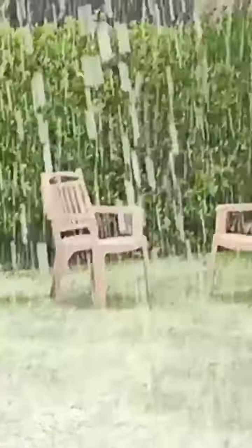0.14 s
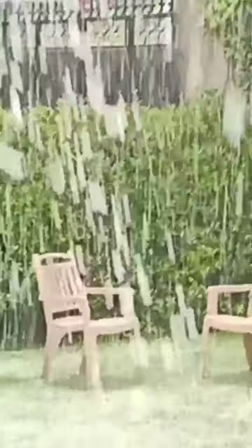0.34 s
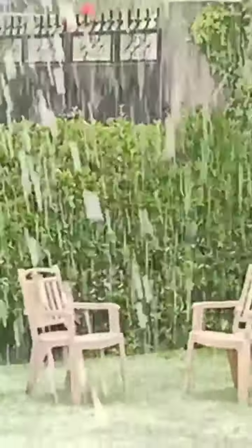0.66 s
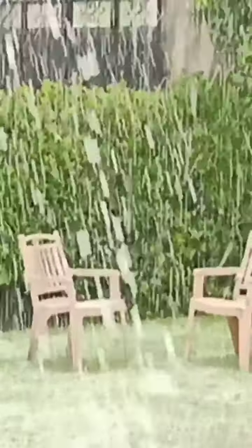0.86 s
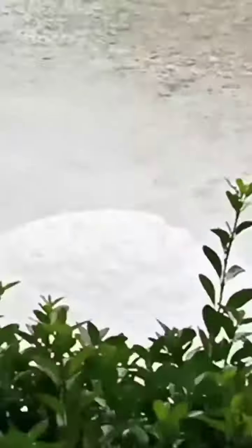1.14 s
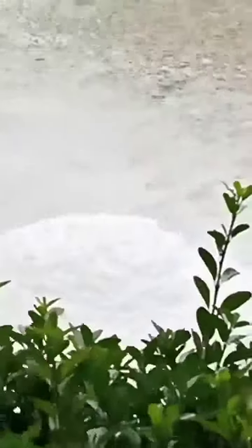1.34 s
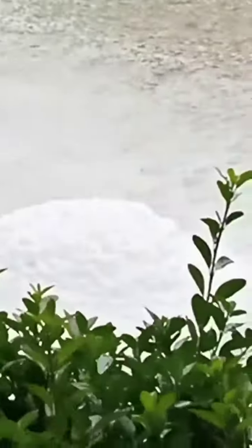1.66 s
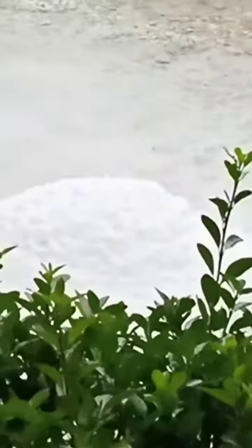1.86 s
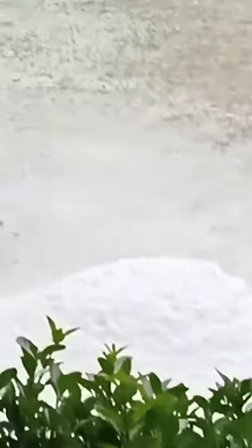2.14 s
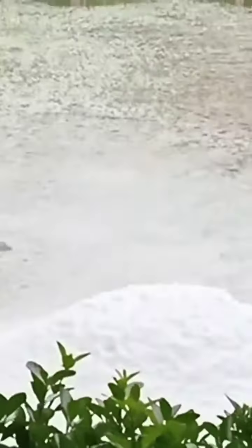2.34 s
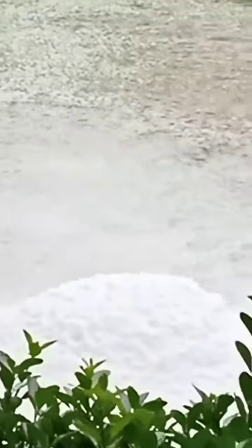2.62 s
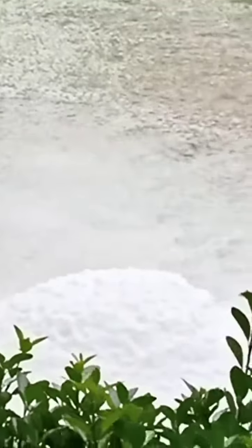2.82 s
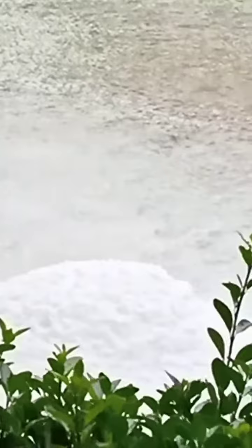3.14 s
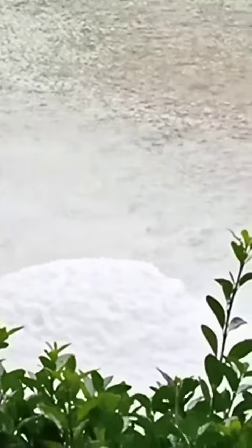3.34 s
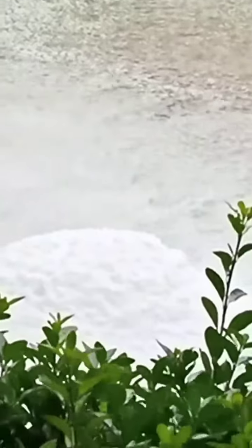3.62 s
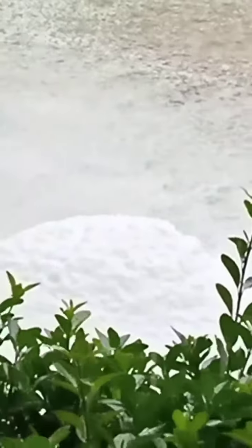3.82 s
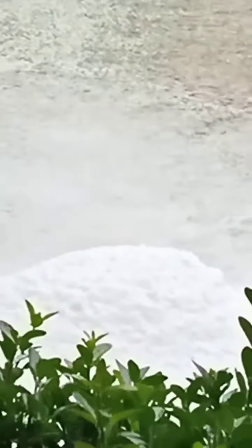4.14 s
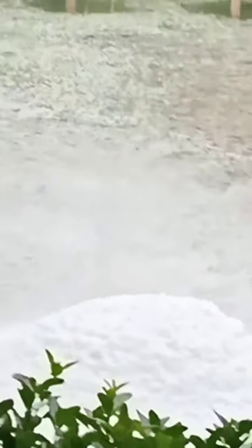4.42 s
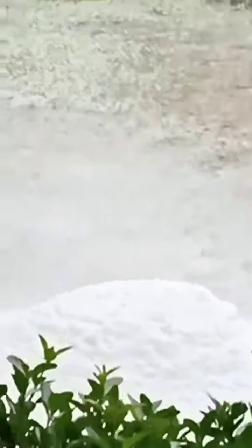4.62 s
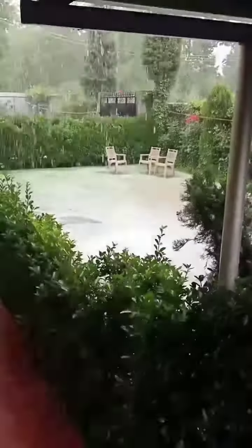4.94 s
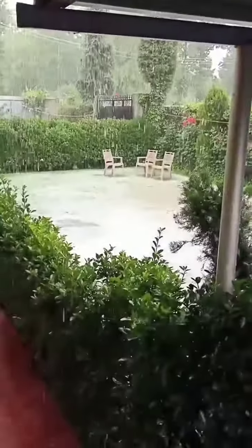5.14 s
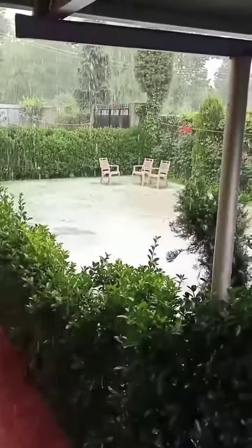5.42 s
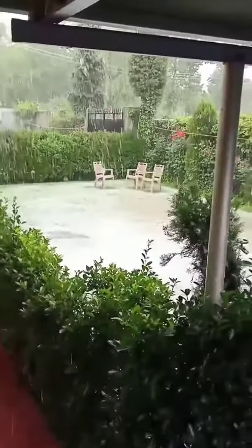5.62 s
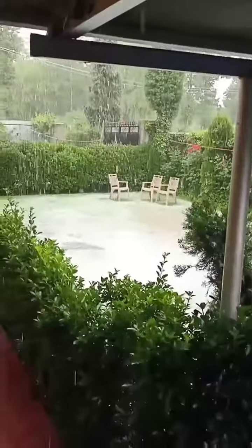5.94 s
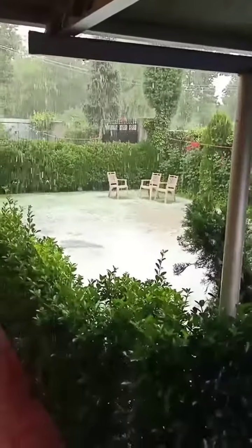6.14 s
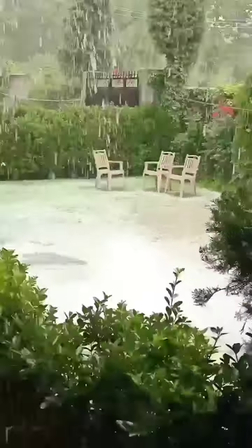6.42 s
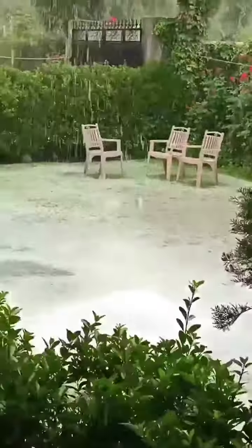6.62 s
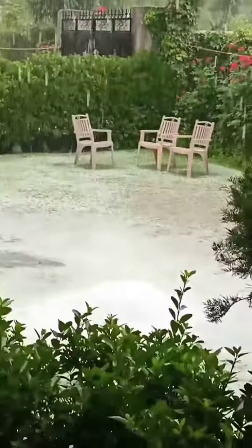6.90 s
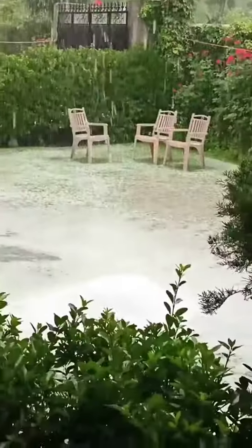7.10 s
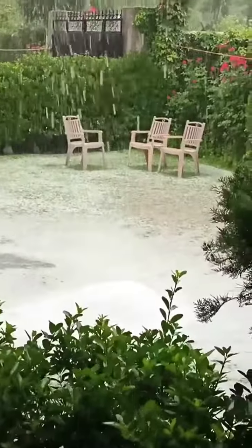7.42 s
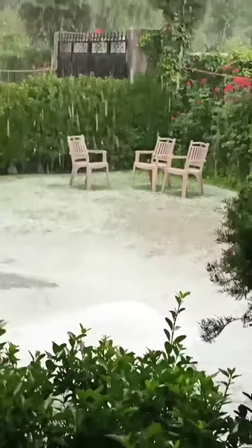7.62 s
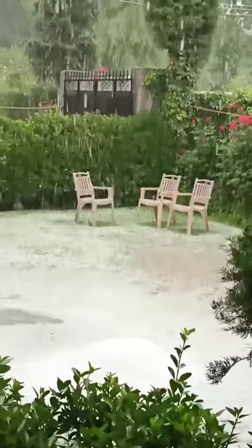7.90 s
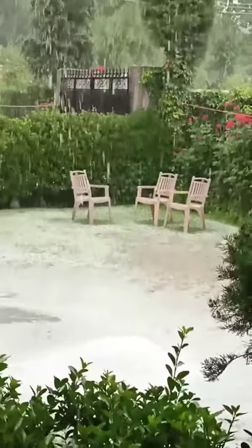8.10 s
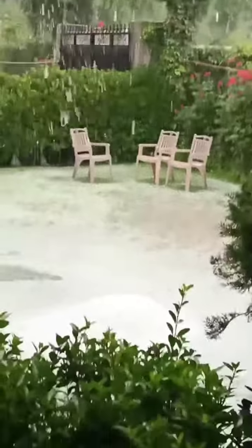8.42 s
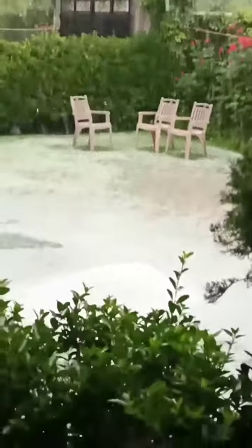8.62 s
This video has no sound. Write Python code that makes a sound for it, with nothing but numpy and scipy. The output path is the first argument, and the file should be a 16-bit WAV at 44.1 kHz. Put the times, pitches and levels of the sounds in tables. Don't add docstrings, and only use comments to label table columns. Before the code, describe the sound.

Dense hail pours down steadily, drumming on a porch roof and pattering on lawn and paving, with low gusts of wind buffeting the microphone.

```python
import sys
import numpy as np
from scipy import signal
from scipy.fft import rfft, irfft, next_fast_len
from scipy.io import wavfile
from scipy.ndimage import uniform_filter1d, map_coordinates

SR = 44100
rng = np.random.default_rng(int(sys.argv[2]) if len(sys.argv) > 2 else 0)


def int16_out(signal):
    q = np.round(np.clip(np.atleast_2d(signal).T, -1, 1) * 32767)
    wavfile.write(sys.argv[1], SR, q.astype(np.int16))


def volts_from_db(level):
    exponent = np.asarray(level, float) / 20
    return 10 ** exponent


N = 386307

TILT_S = 1.25


def unit(x):
    return x / np.sqrt(np.mean(x ** 2) + 1e-20)


def along(points, hz):
    f, v = np.transpose(points)
    return np.interp(np.log(hz + 1), np.log(f + 1), v)


def curves(rows):
    s, *cols = np.transpose(rows)
    return [np.interp(np.arange(N) / SR, s, c) for c in cols]


def wobble(rate):
    knots = rng.standard_normal(int(N * rate / SR) + 4)
    return map_coordinates(knots, [np.arange(N) * rate / SR])


def spell(start, end, edge_s):
    t = np.arange(N) / SR
    return np.clip(np.minimum(t - start, end - t) / edge_s + .5, 0, 1)


def filtered(x, response):
    m = next_fast_len(N + 8192)
    return irfft(rfft(x, m) * response(np.fft.rfftfreq(m, 1 / SR)), m)[..., :N]


def patchy(x, depth_db):
    z = signal.stft(x, nperseg=512)[2]
    field = uniform_filter1d(rng.standard_normal(z.shape[1:]), size=6, axis=0)
    field = uniform_filter1d(field, size=10, axis=1)
    return signal.istft(z * volts_from_db(depth_db * unit(field)), nperseg=512)[1][:, :N]


def strikes(chance, spread_db, near_db):
    lands = rng.random((2, N)) < chance
    size = volts_from_db(spread_db * np.minimum(rng.exponential(size=(2, N)), 4))
    size = size * rng.choice([-1, 1], size=(2, N))
    return rng.standard_normal((2, N)) + volts_from_db(near_db) * unit(lands * size)


# (f/Hz, left-right likeness)
PORT_LIKENESS = [(130, 1), (170, .98), (220, .95), (300, .88), (470, .45), (640, .65), (800, .38),
                 (1200, .26), (1700, .2), (2100, .04)]
# (f/Hz, left minus right level/dB)
PORT_LEAN = [(110, -1), (210, 5.5), (330, 1.5), (500, -0.5), (770, 1), (1170, 3), (1790, 5), (2740, 3),
             (4000, 3), (4600, 1.5), (6400, 0), (6900, 4.5), (7600, -9)]
# (f/Hz, lag of the left port/rad)
PORT_LAG = [(60, 3.5), (300, -0.05), (470, 1), (570, 0.17), (900, 1.16), (1200, 2.5), (1600, 3), (2500, 5)]


def ports(pair, spectrum):
    def mix(hz):
        angle = np.arccos(np.clip(along(PORT_LIKENESS, hz), 0, 1)) / 2
        return volts_from_db(along(spectrum, hz)) * [np.cos(angle), np.sin(angle)]

    def split(hz):
        half = volts_from_db(along(PORT_LEAN, hz) / 2) * np.exp(-.5j * along(PORT_LAG, hz))
        return np.array([half, 1 / half])

    mid, side = filtered(pair, mix)
    return unit(filtered(np.array([mid + side, mid - side]), split))


# (f/Hz, level/dB per Hz)
ROOF_SPECTRUM = [(120, -120), (190, -9.5), (240, -5), (320, 1.5), (400, 1.5), (470, 0), (640, 0),
                 (720, -3.5), (800, -11.5), (1300, -38.5), (2500, -120)]


def roof_drumming(heavy):
    sway_db = 0.87 * wobble(4)
    return volts_from_db(-1.36 + sway_db) * ports(patchy(heavy, depth_db=0.33), ROOF_SPECTRUM)


# (f/Hz, level/dB per Hz)
BOOM_SPECTRUM = [(25, -39), (45, -21.5), (70, -5.5), (100, -1), (160, 3), (210, -6), (280, -21.5),
                 (500, -120)]
# (f/Hz, level/dB of the difference between the ports)
BOOM_SPREAD = [(90, -43), (140, -22), (200, -15)]


def roof_boom(heavy):
    mid, side = filtered(heavy, lambda hz: volts_from_db(along(BOOM_SPECTRUM, hz) + [0 * hz, along(BOOM_SPREAD, hz)]))
    squall_db = 3 * spell(2.3, 3.4, 0.22)
    return unit(np.array([mid + side, mid - side])) * volts_from_db(-12 + 1.3 * wobble(2.5) + squall_db)


# (f/Hz, level/dB per Hz)
GROUND_SPECTRUM = [(120, -120), (300, -48.5), (640, -4.5), (820, -1), (1030, 1), (1400, -2), (2100, -1),
                   (2900, -3), (3600, -9.5), (4300, -29.5), (5000, -61), (6000, -120)]
# (f/Hz, level/dB)
BEFORE_TILT = [(500, 1), (720, 1.5), (1000, -0.5), (1500, 2.5), (2200, 0.5), (3000, -2), (4500, -1.5)]


def ground_patter(stones, flurry):
    ground = volts_from_db(3.5 + .3 * flurry) * ports(patchy(stones, depth_db=0.5), GROUND_SPECTRUM)
    tilted = spell(TILT_S, N, .03)
    return tilted * ground + (1 - tilted) * filtered(ground, lambda hz: volts_from_db(along(BEFORE_TILT, hz)))


# (f/Hz, level/dB per Hz)
CRACKLE_SPECTRUM = [(1500, -120), (3000, -23), (3900, -0.5), (5210, -1), (5300, -5.5), (5600, -6),
                    (6290, -5), (6420, 1), (6700, 1.5), (7200, -4), (7500, -13), (7850, -19), (8100, -120)]


def ground_crackle(stones, flurry, hard_db):
    return volts_from_db(hard_db + 3.5 + 0.7 * flurry) * ports(patchy(stones, depth_db=0.5), CRACKLE_SPECTRUM)


# (t/s, fall level/dB, hardness level/dB of the stones)
HAILFALL = [(0.0, -19, -10), (0.07, -20.5, -10.5), (0.78, -19.5, -10.5), (0.83, -21, -8.5),
            (1.61, -20, -11), (3.88, -20.5, -11), (4.54, -19.5, -12), (6.15, -20, -12),
            (6.17, -22.5, -11.5), (7.2, -19, -13), (7.22, -21, -13), (7.44, -20.5, -13.5), (8.69, -21, -14),
            (8.76, -18.5, -12)]


def hail():
    fall_db, hard_db = curves(HAILFALL)
    flurry = wobble(14)
    heavy = strikes(.02, spread_db=2.0, near_db=-11)
    stones = strikes(.016, spread_db=2.0, near_db=-5.5)
    roof = roof_drumming(heavy) + roof_boom(heavy)
    ground = ground_patter(stones, flurry) + ground_crackle(stones, flurry, hard_db)
    return volts_from_db(fall_db + .4 * wobble(7)) * (roof + ground)


# (start t/s, length t/s, level/dB)
GUSTS = [(0.117, 0.3, -63), (1.02, 0.079, -46), (1.6, 0.44, -45), (1.9, 0.78, -38.5), (3.35, .2, -50),
         (4.15, .1, -58), (4.608, 1.47, -35), (6.1, 0.94, -37), (7.113, .45, -38), (7.75, 0.62, -40),
         (8.55, .2, -51)]
# (f/Hz, level/dB per Hz)
BUFFET_SPECTRUM = [(20, -21), (45, -9.5), (70, 0.5), (115, 0.5), (200, -7.5), (350, -20), (700, -48),
                   (1500, -120)]


def wind():
    gusts = volts_from_db(-70)
    for start, length, db in GUSTS:
        gusts = gusts + volts_from_db(db) * spell(start, start + length, .05)
    lumps = volts_from_db(4.0 * np.array([wobble(22), wobble(22)]) + 1.5 * wobble(8))
    rumble = filtered(rng.standard_normal((2, N)), lambda hz: volts_from_db(along(BUFFET_SPECTRUM, hz)))
    return gusts * unit(lumps * rumble)


def starved(x, coarse, dropped, sway_db, size, count):
    hz, t, z = signal.stft(x, SR, "cosine", nperseg=size)
    bands = np.arange(len(hz)) // count
    jumps = rng.standard_normal((bands[-1] + 1, len(t)))
    luck = rng.random((bands[-1] + 1, len(t) // 2 + 1))
    power = uniform_filter1d(abs(z) ** 2, size=3 * SR // size, axis=2)
    usual = np.sqrt(abs(uniform_filter1d(power, size=count, axis=1)))
    step = usual * volts_from_db(along(coarse, hz)[:, None] + sway_db * jumps[bands]) + 1e-12
    centre_hz = hz[bands * count + count // 2 * (bands < bands[-1])]
    alive = luck[bands][:, np.arange(len(t)) // 2] > along(dropped, centre_hz)[:, None]
    kept = np.round(abs(z) / step) * step * alive
    return signal.istft(z * kept / (abs(z) + 1e-15), SR, "cosine", nperseg=size)[1][:, :N]


THIN_S = (1.25, 5.75)
GAP_TOP_HZ, GAP_RAGGED_HZ = (7800, 8600), (350, 480)


def ragged_edge(thin):
    top_hz, ragged_hz = [usual + (low - usual) * thin for usual, low in (GAP_TOP_HZ, GAP_RAGGED_HZ)]
    edge_hz = top_hz + ragged_hz * (.5 * wobble(6) + wobble(30))
    held = edge_hz[np.arange(N) // 2048 * 2048]
    return np.round(held * 128 / SR) * SR / 128


# (f/Hz, level/dB per Hz)
SHELF_SPECTRUM = [(7700, -120), (7880, 0), (10000, 1), (12000, 2), (12850, -6), (12920, -18), (13150, -8),
                  (13880, -10), (14000, 5), (14900, -3), (15000, -17), (15200, -13), (15750, -1.5)]
FIZZ_DB, FIZZ_LEAN_DB = (-46, -48.5), (3, 13.5)


def fizz(core, tilted):
    level_db, pan_db = [before + (after - before) * tilted for before, after in (FIZZ_DB, FIZZ_LEAN_DB)]
    power = (unit(filtered(core, lambda hz: hz > 4000)) ** 2).mean(axis=0)
    follow = abs(uniform_filter1d(power, size=round(.03 * SR)) / uniform_filter1d(power, size=SR))
    noise = unit(filtered(rng.standard_normal((2, N)), lambda hz: volts_from_db(along(SHELF_SPECTRUM, hz))))
    flutter_db = .7 * wobble(12) + 0.45 * wobble(40)
    return noise * follow ** (.6 / 2) * volts_from_db(level_db + flutter_db + np.array([pan_db, -pan_db]) / 2)


TOP_SHELF_DB = (9, 8)
TOP_ODDS, BUSY_S = (-1, 1.6, .5), 7.05


def top_shelf_db(tilted):
    odds = TOP_ODDS[0] + (TOP_ODDS[1] - TOP_ODDS[0]) * tilted
    odds = odds + (TOP_ODDS[2] - TOP_ODDS[1]) * spell(BUSY_S, N, .03)
    blips = wobble(22) > odds
    return TOP_SHELF_DB[0] + (TOP_SHELF_DB[1] - TOP_SHELF_DB[0]) * tilted - 38 * ~blips


# (start t/s, end t/s, f/Hz)
LEFT_TONES = [(.39, .62, 9350), (.39, 1.4, 10164), (.4, .91, 14643), (.44, .9, 12575), (2.48, 2.62, 10164),
              (2.49, 2.68, 12575), (2.5, 2.7, 11542), (2.68, 2.9, 13609), (4.28, 4.45, 10100),
              (4.31, 4.89, 12575), (4.81, 5.02, 8700), (4.95, 6.18, 10164), (4.96, 8.74, 12575),
              (5.18, 5.5, 8700), (5.29, 5.73, 14643), (5.42, 6.19, 10853), (5.94, 6.15, 9475),
              (6.41, 7.03, 10853), (6.43, 6.65, 14643), (6.48, 7.67, 9475), (7.13, 7.31, 14643),
              (7.56, 7.77, 10853), (7.56, 8.71, 10164), (7.87, 8.38, 10853), (7.99, 8.75, 14643),
              (8.5, 8.75, 10853)]
# (start t/s, end t/s, f/Hz)
RIGHT_TONES = [(.69, 1.06, 14643), (.88, 1.3, 9475), (1.43, 2.36, 10853), (1.49, 1.83, 14643),
               (1.83, 2.103, 12575), (3.114, 3.45, 11542), (3.11, 5.22, 12575), (4.93, 5.22, 10164),
               (5.31, 5.68, 10853), (5.31, 7.34, 12575), (5.44, 6.15, 14643), (6.71, 7.17, 10853),
               (6.73, 7.116, 10164), (6.73, 7.49, 13609), (6.74, 7.49, 14643), (7.13, 7.66, 9475),
               (7.69, 8.02, 14643), (8.19, 8.63, 14643)]
# (f/Hz, level/dB)
TONE_DB = [
    [(9000, -55), (10800, -55.5), (12600, -56), (14600, -56)],
    [(9000, -67), (10800, -66), (12600, -75), (14600, -76)],
]
EARLY_TONE_DB = (-4, 9)


def thin_tone(port, start, end, tone_hz):
    span = np.arange(round(start * SR), min(round(end * SR), N))
    db = along(TONE_DB[port], tone_hz) + EARLY_TONE_DB[port] * (start < TILT_S)
    centre = (np.floor(tone_hz * 128 / SR) + .5) / 128
    envelope = signal.windows.tukey(len(span), 400 / len(span))
    return span, volts_from_db(db) * np.sqrt(2) * np.sin(2 * np.pi * centre * span) * envelope


SHELF_EDGES = np.array([24, 26, 28, 30, 32, 35, 38, 41, 44]) * SR / 128
# (f/Hz, step level/dB over the usual level)
COARSE_TREBLE = [(8000, 8), (9000, 4), (9500, 0), (12800, 3.5), (13000, 7), (13900, 8), (14100, 1),
                 (14800, 2), (15000, 7), (15700, 7)]
# (f/Hz, share of bands left empty)
DROPPED_TREBLE = [(8000, .15), (9000, 0.13), (9700, .04), (12800, 0.025), (13000, .4), (13900, .35),
                  (14100, .02), (14700, 0.24), (15000, .4), (15700, .2)]


def rebuilt_treble(core):
    tilted, thin = spell(TILT_S, N, .03), spell(*THIN_S, .03)
    edge_hz = ragged_edge(thin)
    hz, t, z = signal.stft(fizz(core, tilted), SR, nperseg=512)
    frames = np.minimum(t * SR, N - 1).astype(int)
    z[:, hz < SHELF_EDGES[1]] *= volts_from_db((6 - 3 * thin)[frames])
    z[:, hz[:, None] < edge_hz[frames]] = 0
    z[:, hz > SHELF_EDGES[-1]] *= volts_from_db(top_shelf_db(tilted)[frames])
    tones = np.zeros((2, N))
    for port, rows in enumerate([LEFT_TONES, RIGHT_TONES]):
        for start, end, tone_hz in rows:
            shelf = np.searchsorted(SHELF_EDGES, tone_hz)
            band = (hz >= SHELF_EDGES[shelf - 1]) & (hz < SHELF_EDGES[shelf])
            z[port][np.ix_(band, (t > start) & (t < end))] = 0
            span, tone = thin_tone(port, start, end, tone_hz)
            tones[port, span] += tone
    shelves = signal.istft(z, SR, nperseg=512)[1][:, :N]
    shelves = starved(shelves, COARSE_TREBLE, DROPPED_TREBLE, sway_db=2.0, size=2048, count=24)
    gaps = edge_hz > GAP_TOP_HZ[0] + GAP_RAGGED_HZ[0]
    rim = uniform_filter1d(gaps * thin, size=500) * filtered(core, lambda hz: hz > 7520)
    return shelves + tones * volts_from_db(0.98 * wobble(20)) - rim


def scene():
    return hail() + wind()


def roll_off(x):
    return signal.sosfilt(signal.butter(12, 15750, fs=SR, output="sos"), x)


# (f/Hz, step level/dB over the usual level)
COARSE = [(600, -12), (1500, -3), (2600, 0), (3300, 4), (4300, 6.5), (5200, 6), (5400, 9), (6300, 10),
          (6450, 4), (7200, 5), (7700, 8)]
# (f/Hz, share of bands left empty)
DROPPED = [(2800, 0), (3300, .004), (4500, .02), (5150, .02), (5330, .25), (5520, .07), (5930, .08),
           (6130, .45), (6330, .12), (6500, 0), (7200, .02), (7800, .4)]


def record(dry):
    dry = dry / (1 + abs(dry / .93) ** 6) ** (1 / 6)
    halves = np.array([dry[0] + dry[1], dry[0] - dry[1]]) / 2
    mid, side = starved(halves, COARSE, DROPPED, sway_db=2.0, size=3072, count=14)
    core = np.array([mid + side, mid - side])
    mix = core + rebuilt_treble(core)
    return roll_off(mix)


dry = scene()
out = record(dry)
int16_out(out)
```